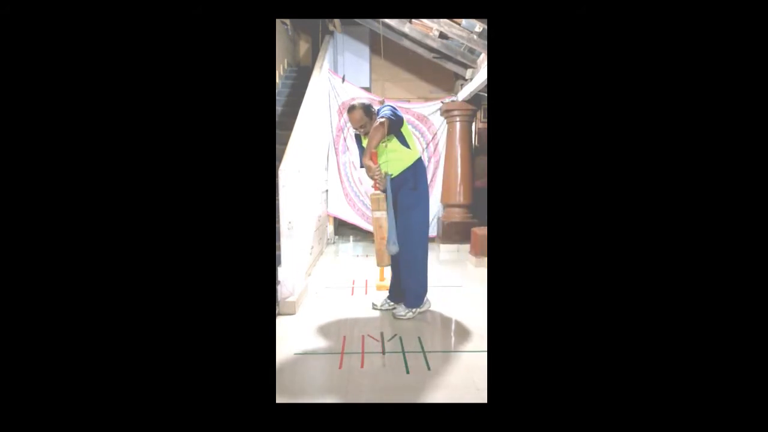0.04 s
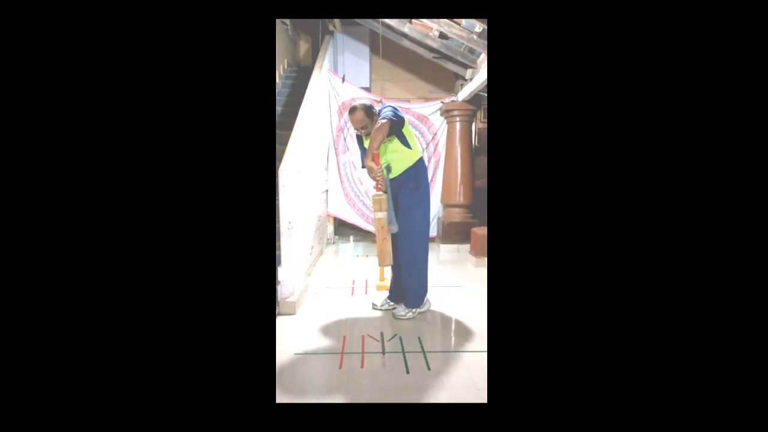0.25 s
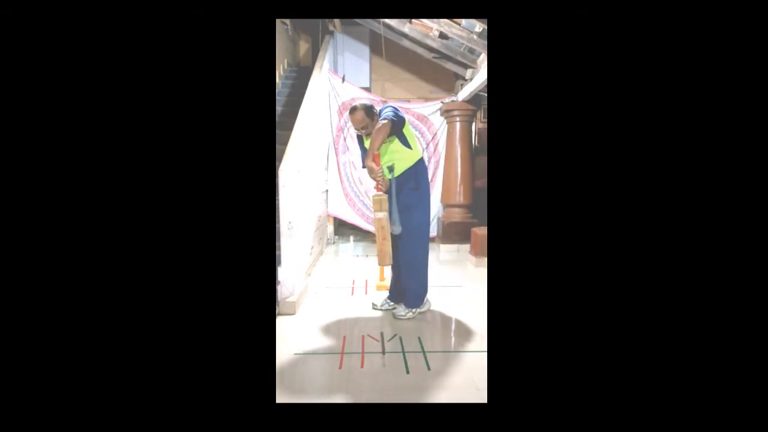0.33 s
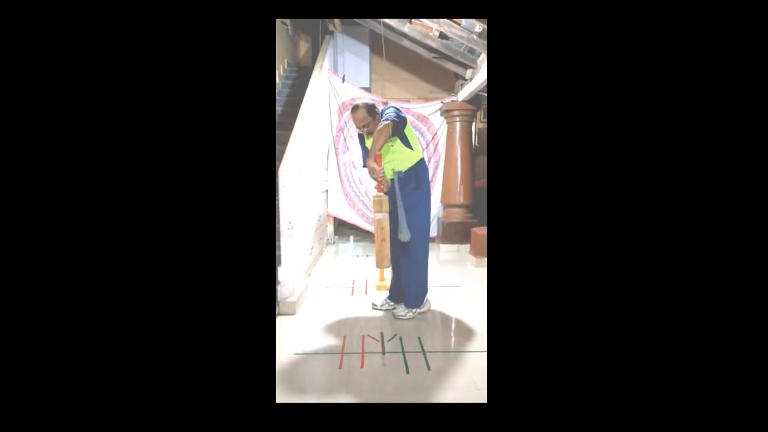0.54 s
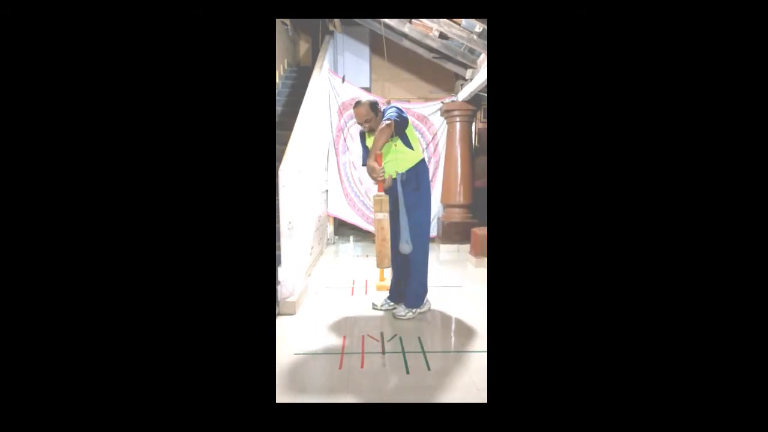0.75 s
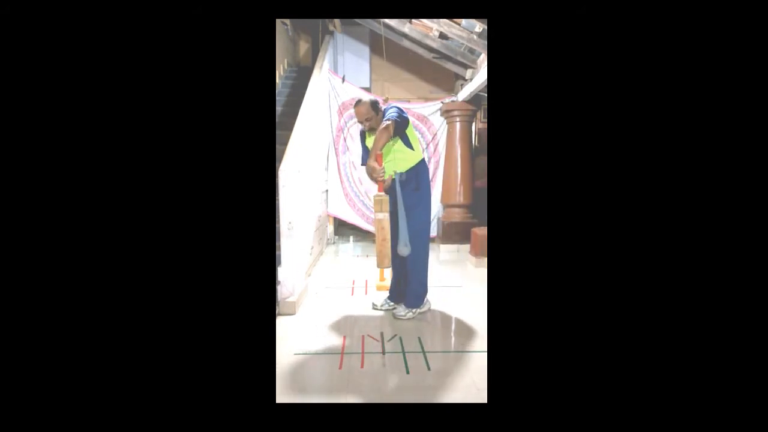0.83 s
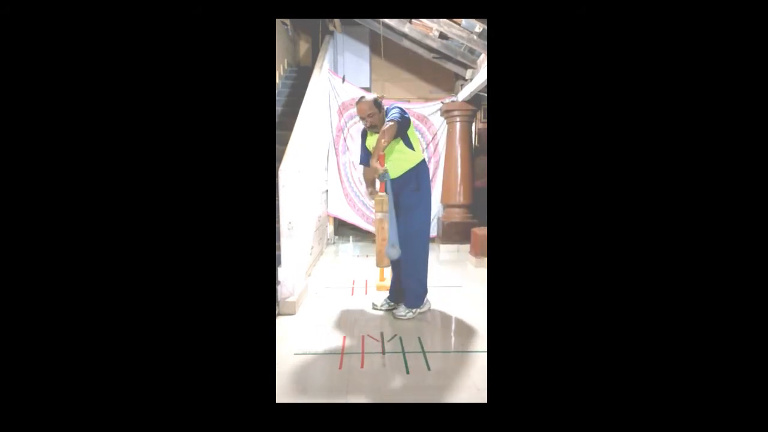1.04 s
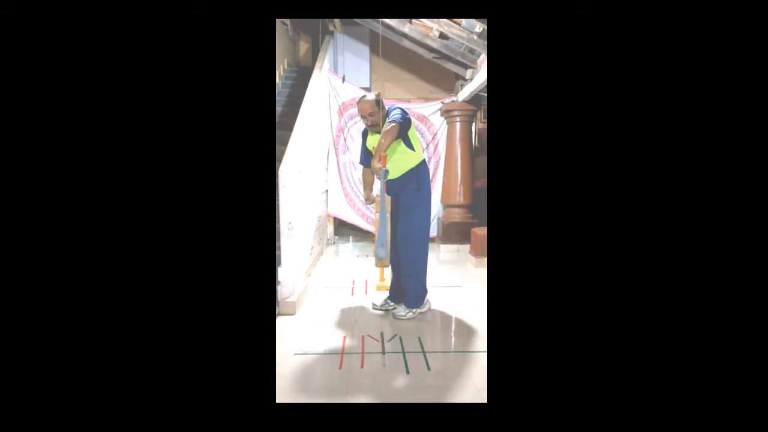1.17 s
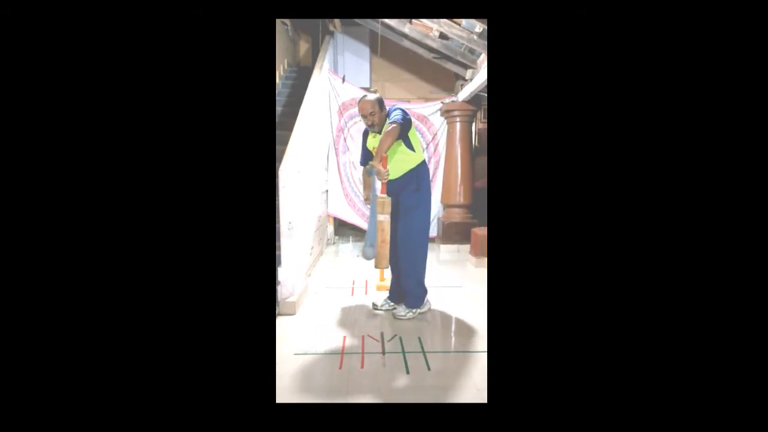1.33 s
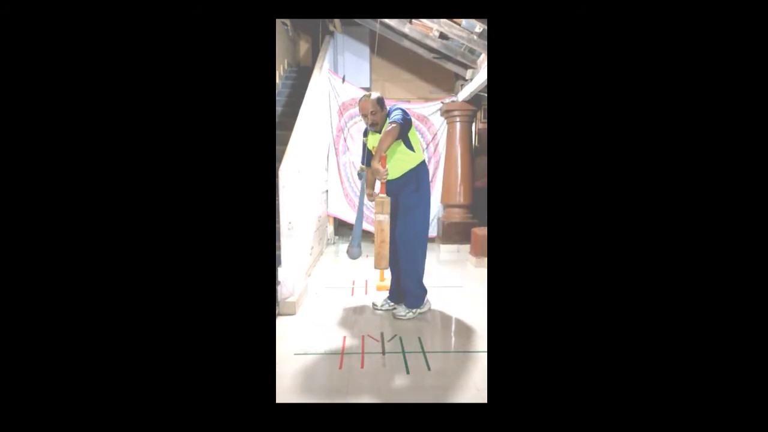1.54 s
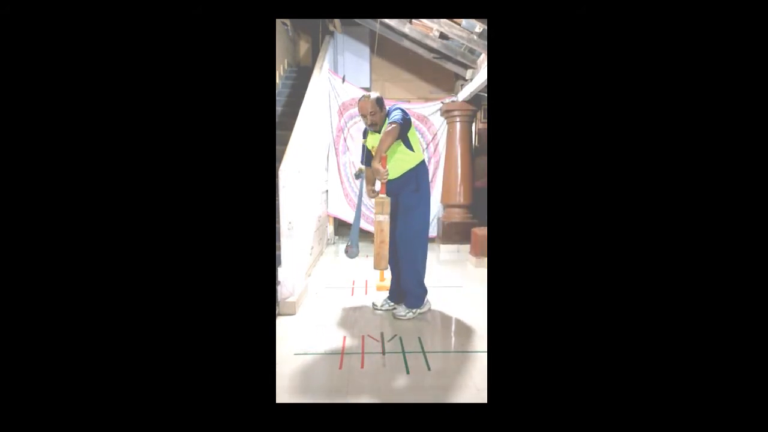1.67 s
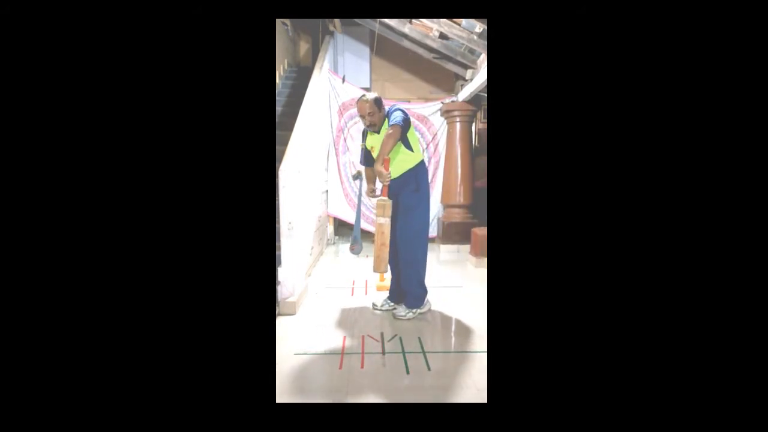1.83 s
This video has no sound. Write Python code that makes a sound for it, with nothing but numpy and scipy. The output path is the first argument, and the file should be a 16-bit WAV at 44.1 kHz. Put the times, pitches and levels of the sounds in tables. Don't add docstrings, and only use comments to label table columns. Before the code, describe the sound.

Single hard woody bat-and-ball knock with short hard-walled echo, followed by a dry metallic squeal

```python
import sys
import numpy as np
from scipy import signal
from scipy.fft import rfft, irfft, next_fast_len
from scipy.io import wavfile
from scipy.ndimage import uniform_filter1d

SR = 44100
rng = np.random.default_rng(int(sys.argv[2]) if len(sys.argv) > 2 else 0)


def natural_amplitude(level_db):
    exponent = np.asarray(level_db, float) / 20
    return 10 ** exponent


def store_pcm(level_fs):
    pcm = np.round(np.clip(level_fs, -1, 1) * 32767).astype(np.int16)
    wavfile.write(sys.argv[1], SR, np.atleast_2d(pcm).T)


N = 83790
TIME_S = np.arange(N) / SR
LEFT_RIGHT = np.array([[1], [-1]])


def rms_one(x):
    return x / np.sqrt(np.mean(x ** 2) + 1e-20)


def at_hz(points, hz):
    table_hz, value = np.transpose(points)
    return np.interp(np.log(hz), np.log(table_hz), value)


def drift(rate_hz):
    r = np.exp(-20 * np.pi * rate_hz / SR)
    section = [1, 0.0047, 0.0035, 1, -2 * r, r * r]
    slow = signal.sosfilt([section] * 2, rng.standard_normal(N // 10 + 1502))[1500:]
    return np.interp(np.arange(N) / 10, np.arange(len(slow)), rms_one(slow))


# hz, likeness_0_to_1
LIKENESS = [(60, .93), (150, 0.95), (300, 0.6), (700, 0.8), (1500, 0), (5000, 0), (8000, .75), (13000, .95)]


def band(hz, octaves, order=2):
    edges_hz = [hz * 2 ** (-octaves / 2), min(hz * 2 ** (octaves / 2), 0.45 * SR)]
    sos = signal.butter(order, edges_hz, "band", fs=SR, output="sos")
    mid, side = signal.sosfilt(sos, rng.standard_normal((2, N + 4000)))[:, 4000:]
    alike = np.clip(at_hz(LIKENESS, hz), 0, 1)
    return np.sqrt(1 + alike) * mid + np.sqrt(1 - alike) * side * LEFT_RIGHT


# hz, level_db_per_hz
FLOOR_COLOUR = [(25, -5), (65, -0.5), (100, -14), (250, -8), (600, -21), (1500, -20.5), (5000, -26),
                (15000, -39.5)]
FLOOR_DB = -69
DUCK_DB, DUCK_HZ, DUCK_FROM_S, DUCK_FADE_S = -11.5, (1200, 9500), 0.57, 0.04


def background():
    duck_db = DUCK_DB * np.clip((TIME_S - DUCK_FROM_S) / DUCK_FADE_S, 0, 1)
    out = 0
    for hz in 28 * 2 ** np.arange(0, 9.2, 0.5):
        lowered = DUCK_HZ[0] < hz < DUCK_HZ[1]
        out = out + natural_amplitude(at_hz(FLOOR_COLOUR, hz) + duck_db * lowered) * band(hz, 0.5)
    return natural_amplitude(FLOOR_DB) * rms_one(out)


# start_s, length_s, centre_hz, width_octaves, level_db
SWELLS = [(-0.104, 0.24, 140, 0.98, -50.5), (-0.215, 0.37, 970, 3.1, -48), (-0.034, 0.49, 394, 0.88, -50),
          (-0.036, 0.29, 5160, 0.42, -60), (0.053, 0.31, 2200, 0.77, -66.5), (.155, .17, 900, 0.06, -51.5),
          (.235, .24, 11000, 0.26, -73), (.435, 0.21, 5200, 0.15, -55), (1.2, 0.11, 754, 0.68, -68.5),
          (1.9, 0.18, 1180, .2, -69), (0.584, 0.25, 560, .15, -63.5), (0.84, 0.33, 760, 0.12, -62),
          (-.02, .2, 550, 0.15, -54.5), (.07, 0.093, 2100, 0.049, -66.5), (.09, 0.22, 190, .6, -59),
          (1.09, 0.79, 1605, 0.2, -69), (1.567, 0.35, 2050, 0.18, -67), (0.222, 1, 886, 0.11, -52.5),
          (0.446, 0.31, 695, 0.088, -52), (0.417, 0.72, 769, 0.55, -53.5), (0.312, 0.92, 1495, 1.63, -52.5),
          (0.411, 0.24, 4720, 0.61, -62), (0.689, 0.47, 5240, 0.34, -70), (0.768, 0.32, 400, 0.8, -58.5),
          (1.089, 0.27, 1102, 0.16, -64.5), (1.217, 0.45, 449, 0.53, -59), (1.468, 0.25, 570, 0.55, -59.5),
          (1.246, 0.17, 5540, 0.38, -60), (1.308, 0.29, 3600, 1.3, -50.5), (1.24, 0.56, 2160, 0.47, -59),
          (0.227, 0.51, 266, 0.84, -52), (1.623, 0.32, 4510, 0.7, -59.5), (1.322, 0.23, 954, 0.2, -56),
          (1.641, 0.26, 1373, 0.23, -66.5), (1.567, 0.41, 902, 0.4, -59.5), (1.77, 0.3, 660, 0.23, -67)]
SWELL_PATCHY_DB, SWELL_PEAK_AT = 1.5, 0.23


def swells():
    out = 0
    for start_s, length_s, hz, octaves, level_db in SWELLS:
        angle = np.interp((TIME_S - start_s) / length_s, [0, SWELL_PEAK_AT, 1], [0, 1, 2])
        shape = np.sin(np.pi / 2 * angle) ** 2
        noise = rms_one(band(hz, octaves, order=4))
        out = out + noise * shape * natural_amplitude(level_db + SWELL_PATCHY_DB * drift(30))
    return out


# start_s, peak_db
KNOCKS = [
    (.2272, -6),
    (.2295, -10.5),
    (.2368, -10.5),
    (0.2446, -14),
    (0.2535, -9),
    (0.2774, -17),
    (0.293, -15.5),
]
# hz, lean_db
LEAN = [(60, 0.5), (180, 0), (550, 1.5), (1650, 4), (4970, 0), (15000, -1)]
# hz, level_db_per_hz
TAIL_COLOUR = [(45, -29), (90, -31.5), (125, -13.5), (559, -12), (844, -18), (2400, -26.5), (3500, -41.5),
               (5440, -41), (7400, -62), (10000, -76.5)]
# hz, t60_s
TAIL_T60 = [(60, 1.55), (130, 0.45), (400, 0.59), (1000, 0.48), (2500, 0.37), (6000, 0.32), (9000, 0.42)]
TAIL_DB, TAIL_RISE_S = -19, 0.003


def lean_at(hz):
    return at_hz(LEAN, hz) / 2 * LEFT_RIGHT


def tail():
    since_s = np.maximum(TIME_S - KNOCKS[0][0], 0)
    steady, dying = 0, 0
    for hz in 45 * 2 ** np.arange(0, 8.2, 1 / 3):
        noise = natural_amplitude(at_hz(TAIL_COLOUR, hz) + lean_at(hz)) * band(hz, 1 / 3, order=3)
        steady = steady + noise
        dying = dying + noise * natural_amplitude(-60 * since_s / at_hz(TAIL_T60, hz))
    return natural_amplitude(TAIL_DB) * dying / np.std(steady) * (1 - np.exp(-since_s / TAIL_RISE_S))


# mode_hz, level_db, t60_s
MODES = [(127.6, -11.5, 0.19), (171, -10, 0.14), (250, -4, 0.18), (353, -6, 0.056), (360.8, -5.5, 0.13),
         (428.5, 0.5, 0.063), (481, -13.5, 0.06), (579, 2.5, 0.045), (700, -2.5, 0.041),
         (1112, -5.5, 0.036), (1390, -13.5, 0.025), (1735, -8.5, 0.027), (2152, -6.5, 0.023),
         (2530, -12.5, 0.013), (2850, -16.5, .015)]
KNOCK_DB, FIRST_DB, ECHO_DB, MODE_SCATTER_DB = -17.5, 1, 10, 5
ECHO_DULL_DB_PER_S_KHZ = 40
TOUCH_S, TOUCH_DB = 0.2258, -36
BODY_CUT_HZ, CONTACT_HZ = 132, 3020


def knock():
    out = np.zeros((2, N))
    start_s, peak_db = np.transpose(KNOCKS)
    delay_s = start_s - start_s[0]
    for hz, level_db, t60_s in MODES:
        clicks = np.full((2, N), 1e-18)
        lean_db = lean_at(hz)
        mode_db = KNOCK_DB + level_db

        echo_db = peak_db + ECHO_DB + mode_db + lean_db - ECHO_DULL_DB_PER_S_KHZ * delay_s * hz / 1000
        scatter_db = MODE_SCATTER_DB * rng.standard_normal((len(start_s), 2)).T
        sign = rng.choice([-1, 1], (len(start_s), 1 + (hz > 450))).T
        clicks[:, (start_s * SR).astype(int)] = natural_amplitude(echo_db + scatter_db) * sign

        direct_sign = (-1) ** (hz > 400) * (-1) ** (hz > 1500)
        clicks[:, int(start_s[0] * SR)] = direct_sign * natural_amplitude(mode_db + FIRST_DB + lean_db[:, 0])
        clicks[:, int(TOUCH_S * SR)] = natural_amplitude(mode_db + TOUCH_DB)

        r, w = natural_amplitude(-60 / (t60_s * SR)), 2 * np.pi * hz / SR
        out += signal.lfilter([0, np.sin(w)], [1, -2 * r * np.cos(w), r * r], clicks)
    sos = signal.butter(4, [BODY_CUT_HZ, CONTACT_HZ], "band", fs=SR, output="sos")
    return signal.sosfilt(sos, out)


# start_s, peak_db
CATCHES = [
    (1.079, -62.5),
]
CATCH_HZ, CATCH_OCTAVES, CATCH_T60_S = 4490, 0.73, 0.006


def catches():
    shape = 0
    for start_s, peak_db in CATCHES:
        since_s = np.maximum(TIME_S - start_s, 0)
        shape = shape + natural_amplitude(peak_db - 60 * since_s / CATCH_T60_S) * (TIME_S >= start_s)
    return shape * rms_one(band(CATCH_HZ, CATCH_OCTAVES))


def porch(x, t60_s):
    size = next_fast_len(N + SR)
    w = 2 * np.pi * np.arange(size // 2 + 1) / size
    spectrum = rfft(x, size)
    out = []
    for lags in rng.uniform(0.011, 0.045, (2, 10)) * SR:
        response = 0
        for k, lag in enumerate(lags):
            loop = natural_amplitude(-60 * lag / SR / t60_s) * np.exp(-1j * w * lag)
            response = response + (-1) ** k * loop / (1 - loop)
        out.append(irfft(spectrum * response, size)[:N])
    return np.array(out) * x.std() / np.std(out)


WAVER_HZ, WAVER_GROWS_S = 104.6, 0.17


def slip(rows, waver, flutter_db, partial_db, count):
    start_s, *columns = np.transpose(rows)
    hz, level_db, *rest = [np.interp(TIME_S, start_s, column) for column in columns]
    shake = drift(WAVER_HZ)
    shake = shake - uniform_filter1d(shake, size=2500)
    depth = waver * np.clip((TIME_S - start_s[0]) / WAVER_GROWS_S, 0.3, 1)
    phase = 2 * np.pi * np.cumsum(hz * (1 + depth * shake)) / SR
    tone = 0
    for k in range(1, count + 1):
        strength = natural_amplitude(partial_db(k, hz, rest) + flutter_db * drift(60))
        tone = tone + strength * np.sin(k * phase + k * k)
    sounding = (TIME_S > start_s[0]) & (TIME_S <= start_s[-1])
    return np.sqrt(2) * tone * natural_amplitude(level_db) * sounding


# start_s, pitch_hz, level_db, second_partial_db, thirds_db
HIGH_FIRST = [
    (1.06, 2738, -73.5, -6, -64),
    (1.085, 2811, -55.5, 7.5, -44),
    (1.16, 2810, -46.5, -8, -52),
    (1.21, 2807, -42, 3.5, -33.5),
    (1.247, 2813, -42.5, -9.5, -20.5),
    (1.256, 2850, -37, -11, -27),
    (1.32, 2831, -42, -10.5, -27),
    (1.37, 2850, -54, -4, -12.5),
    (1.44, 2845, -53, -2, -24),
]
# start_s, pitch_hz, level_db, second_partial_db, thirds_db
HIGH_RETURN = [
    (1.59, 2820, -71.5, 16.5, -5),
    (1.62, 2884, -43, -8.5, -25.5),
    (1.68, 2906, -47.5, -17, -32),
    (1.71, 2836, -41, -7, -33),
    (1.76, 2850, -44, -6, -37),
    (1.806, 2855, -37, -15, -34),
    (1.855, 2859, -42.5, -11.5, -43.5),
    (1.872, 2890, -47.5, -1.5, -35),
    (1.9, 2822, -41, -12, -35),
]
# hz, level_db
THIRDS_COLOUR = [(950, -5.5), (1900, -7), (3800, -6.5), (4700, -1), (6600, -24.5), (7600, -20)]
THIRD_PARTIAL_DB = -33.5
HIGH_WAVER, RETURN_WAVER, HIGH_FLUTTER_DB = 0.026, 0.012, 4


def high_partial_db(k, hz, rest):
    second_db, thirds_db = rest
    if k in (3, 6, 9):
        return {3: 0, 6: second_db, 9: THIRD_PARTIAL_DB}[k]
    return thirds_db + at_hz(THIRDS_COLOUR, k * hz)


def high_squeal():
    third = np.array([1, 1 / 3, 1, 1, 1])
    first = slip(np.array(HIGH_FIRST) * third, HIGH_WAVER, HIGH_FLUTTER_DB, high_partial_db, count=9)
    back = slip(np.array(HIGH_RETURN) * third, RETURN_WAVER, HIGH_FLUTTER_DB, high_partial_db, count=9)
    return first + back


# start_s, pitch_hz, level_db, slow_partials_db, fourth_partial_db
LOW = [
    (1.335, 816, -57, -10, -4),
    (1.36, 836, -46, -14.5, 8),
    (1.39, 842.7, -47, -3, 9.5),
    (1.48, 848.7, -44.5, 2.5, -8.5),
    (1.54, 845.4, -42.5, 0, 6.5),
    (1.58, 858.2, -45.5, 2, -4),
    (1.63, 879, -50.5, -1, 3),
    (1.68, 868, -58, -1, -9),
    (1.73, 866, -78.5, -9, 0),
]
# hz, level_db
LOW_COLOUR = [(850, -4), (1700, -20), (2550, 0.5), (4250, -11.5), (5100, -9.5), (6800, -23), (8500, -35.5),
              (10200, -32.5), (11200, -38.5)]
LOW_WAVER, LOW_FLUTTER_DB = 0.0052, 2


def low_partial_db(k, hz, rest):
    slow_db, fourth_db = rest
    return at_hz(LOW_COLOUR, k * hz) + slow_db * (k in (1, 2, 5)) + fourth_db * (k == 4)


def low_squeal():
    return slip(LOW, LOW_WAVER, LOW_FLUTTER_DB, low_partial_db, count=13)


# time_s, left_minus_right_db
SWING = [
    (1.07, -10),
    (1.15, 4),
    (1.27, -1),
    (1.42, 4),
    (1.601, 2),
    (1.7, -2),
    (1.78, -5),
    (1.86, -1),
    (1.9, -4),
]
HINGE_WET_DB, HINGE_DRY_DB, PORCH_T60_S = 2, -3.5, 0.33


def hinge():
    squeal = high_squeal() + low_squeal()
    swing_db = np.interp(TIME_S, *np.transpose(SWING)) / 2 * LEFT_RIGHT
    return natural_amplitude(swing_db) * (natural_amplitude(HINGE_DRY_DB) * squeal + natural_amplitude(HINGE_WET_DB) * porch(squeal, PORCH_T60_S))


def scene():
    return background() + swells() + tail() + knock() + catches() + hinge()


def roll_off(x):
    return signal.sosfilt(signal.butter(12, 15720, fs=SR, output="sos"), x)


def record(dry):
    limit = 0.9
    return roll_off(limit * np.tanh(dry / limit))


dry = scene()
out = record(dry)
store_pcm(out)
```